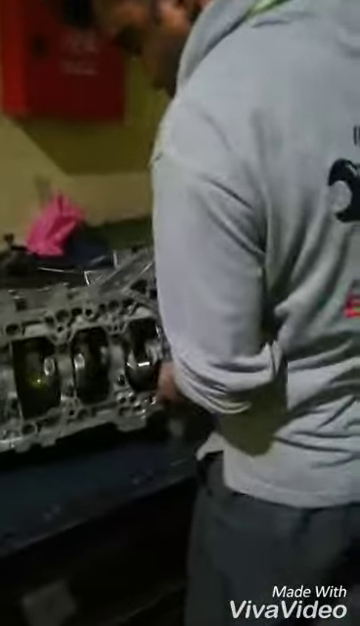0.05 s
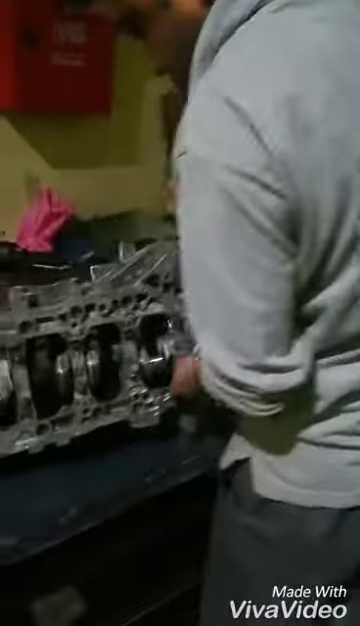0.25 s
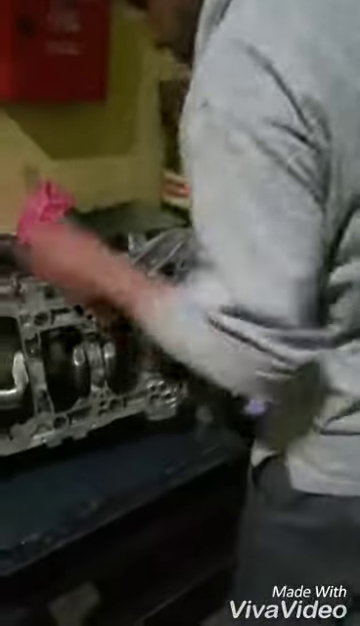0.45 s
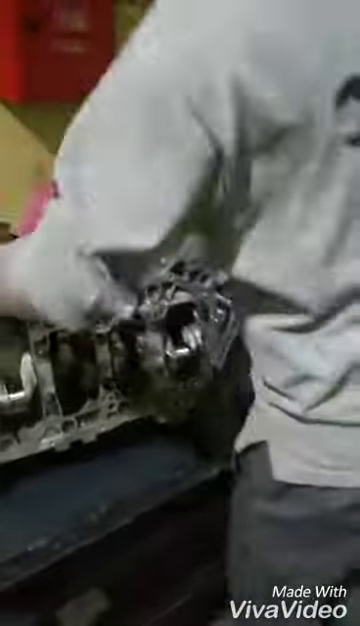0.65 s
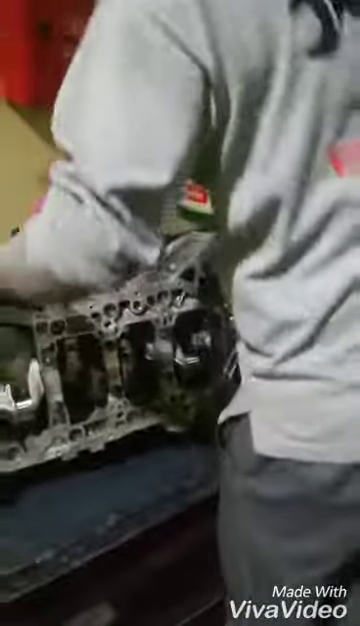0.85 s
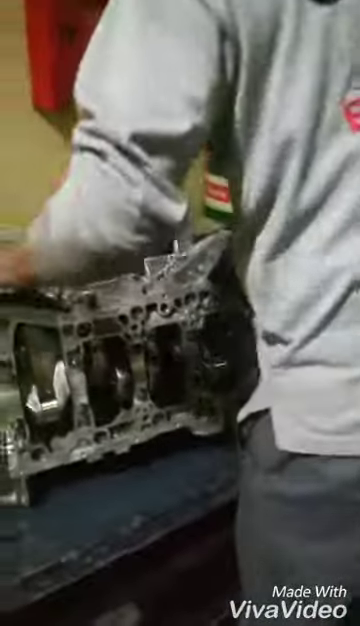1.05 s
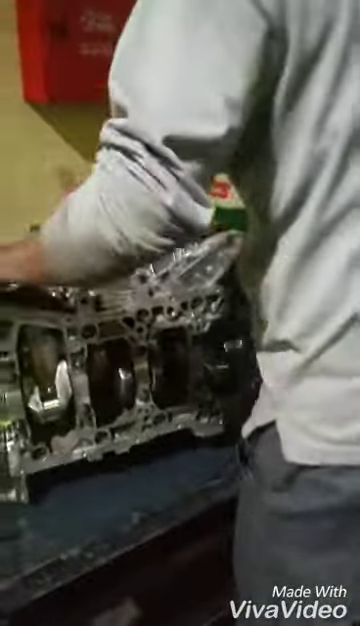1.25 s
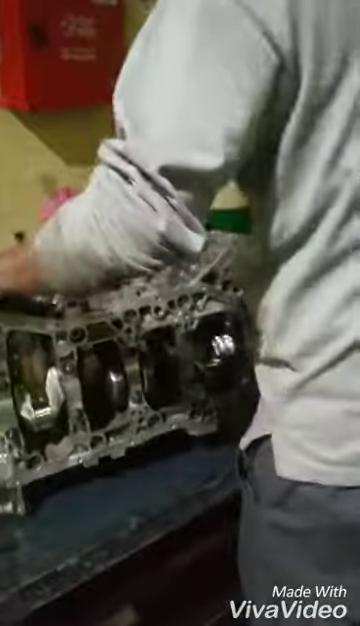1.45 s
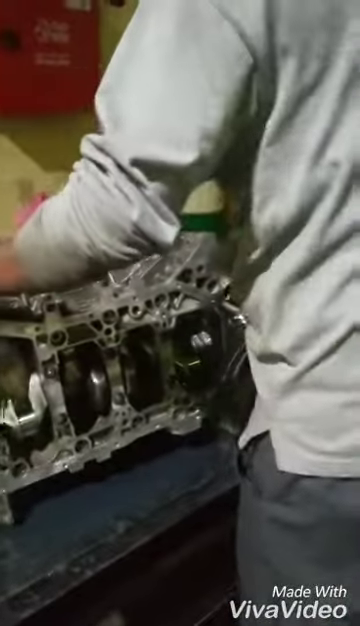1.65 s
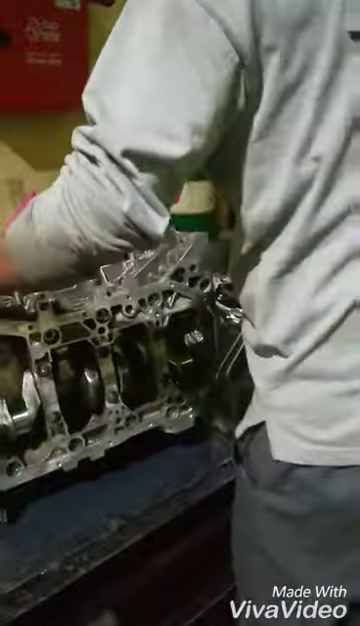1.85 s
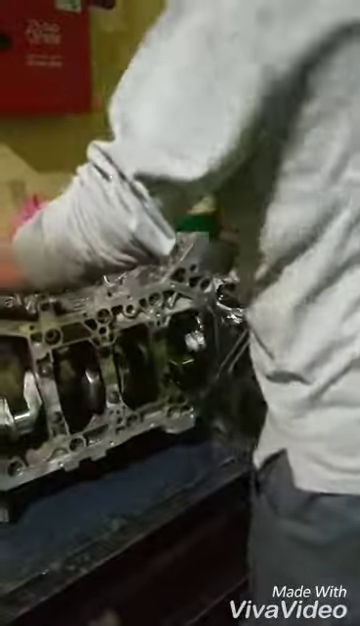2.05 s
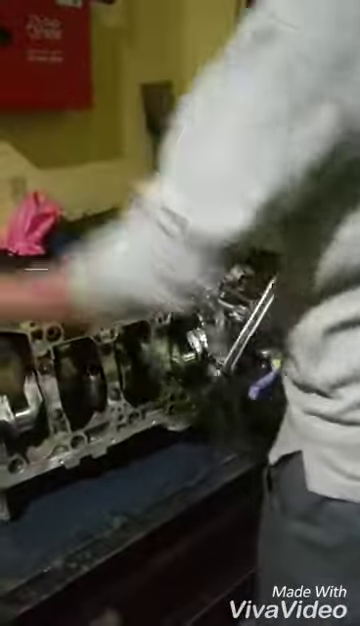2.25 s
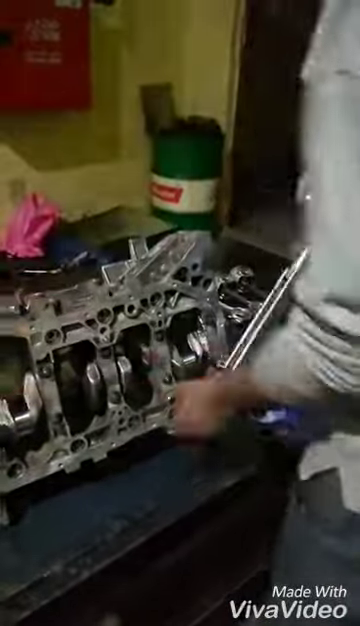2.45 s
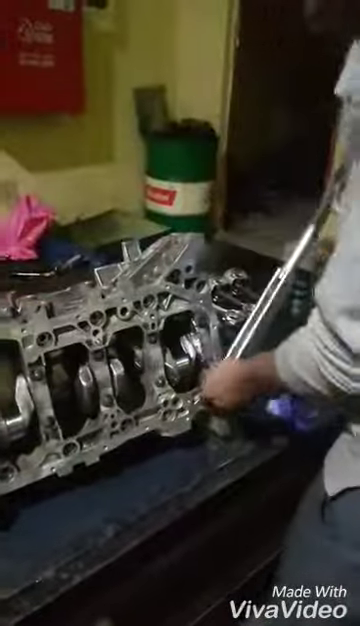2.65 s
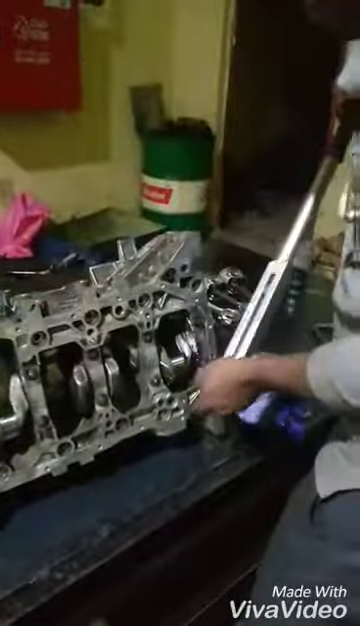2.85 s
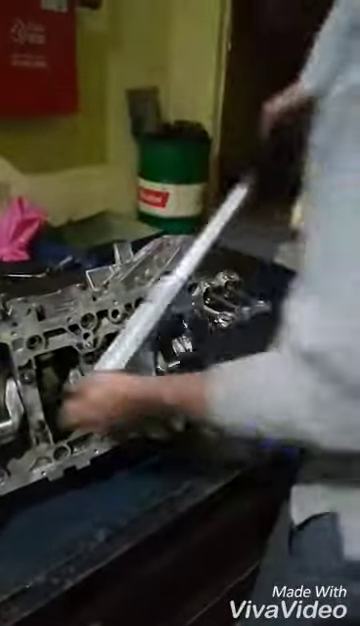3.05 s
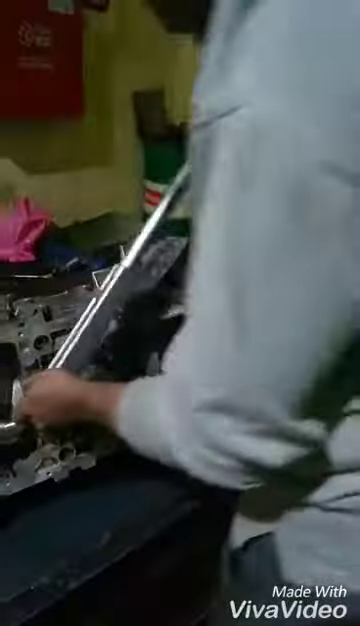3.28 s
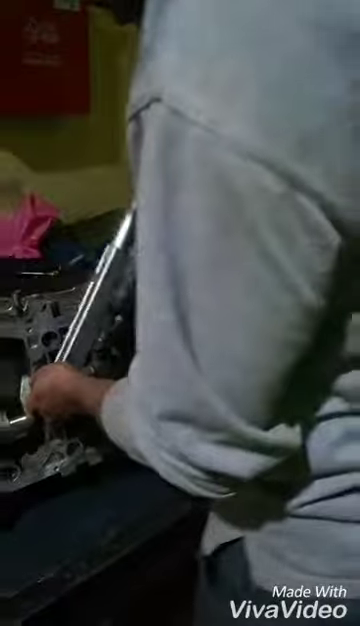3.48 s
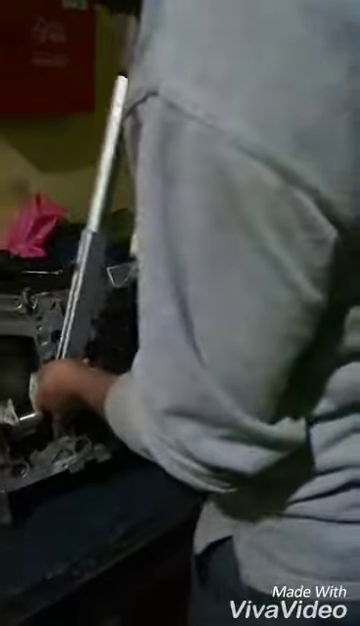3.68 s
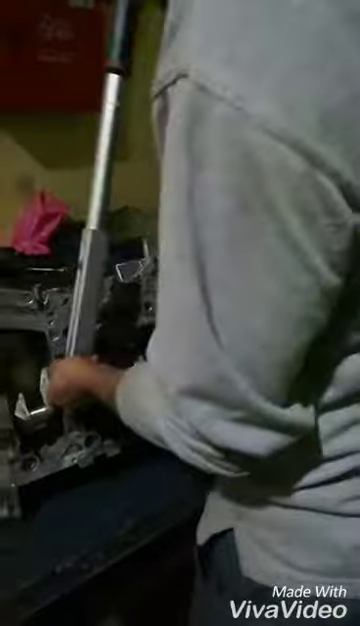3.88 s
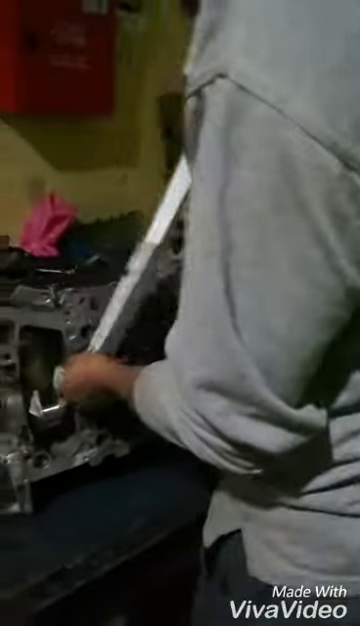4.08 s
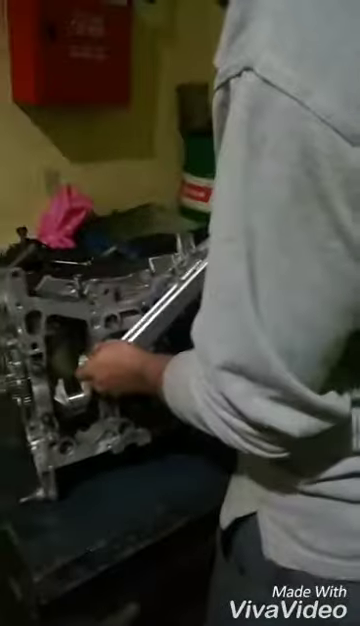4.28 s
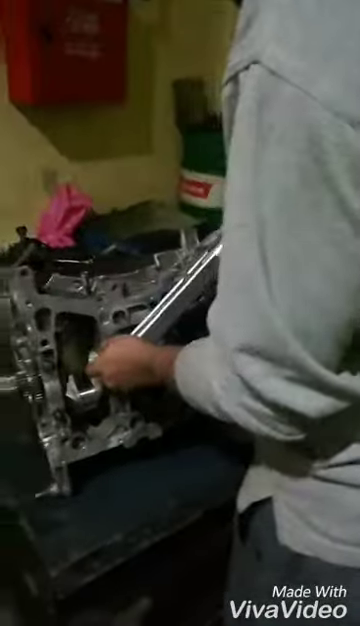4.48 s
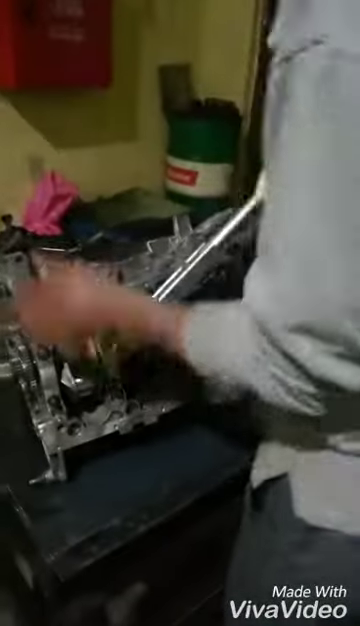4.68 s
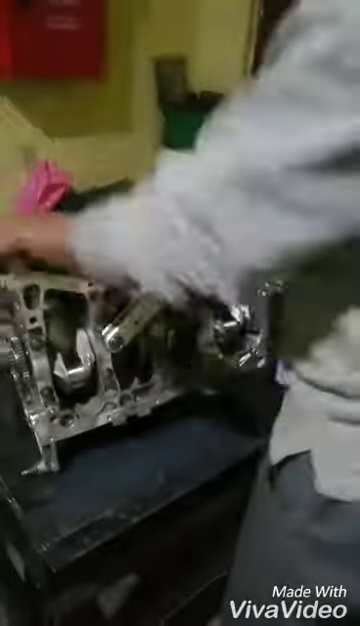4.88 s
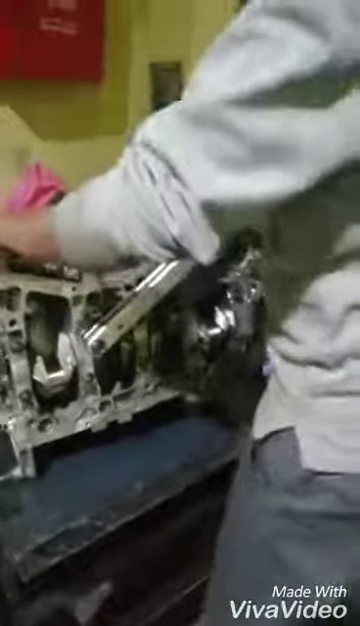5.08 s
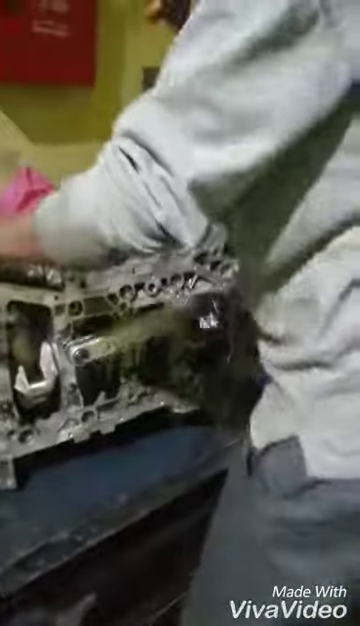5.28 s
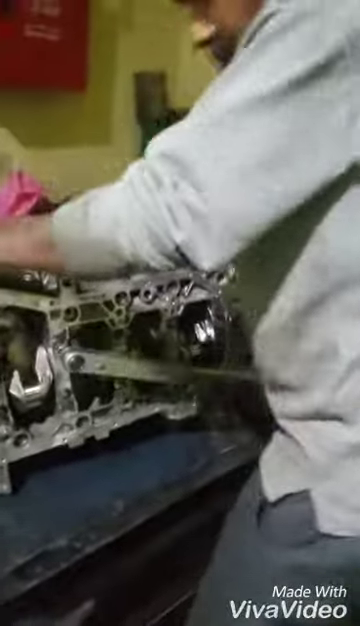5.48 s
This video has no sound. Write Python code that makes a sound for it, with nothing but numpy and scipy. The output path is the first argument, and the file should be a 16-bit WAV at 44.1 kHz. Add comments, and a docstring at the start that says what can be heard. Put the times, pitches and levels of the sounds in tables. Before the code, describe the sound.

Sharp, ringing metal snaps from a wrench over a low hum that sinks away, followed by quieter clicks, cloth rustle and soft bench knocks.

```python
"""A bare workshop, where a ratchet wrench is worked on the bolts of an engine block.
Snaps and clinks are metal modes struck by uneven contacts, with a broad crack and a diffuse hall tail.
Treble ticks lie on the right; sleeves rub in grainy noise, the bench thuds in short sines, a squeak ends it.
Shaped noise makes hall and rumble, wavering sines the machine hum; after the first snaps the hall noise
sinks by about 25 dB, with hum and most of the rumble following. A faint hiss and whine stay steady."""
import sys
import numpy as np
from scipy import signal
from scipy.io import wavfile

SR = 44100
rng = np.random.default_rng(int(sys.argv[2]) if len(sys.argv) > 2 else 0)


def output_pcm(signal):
    """Save a mono or channel-first signal as 16-bit PCM at the path in sys.argv[1].

    Samples are clipped to [-1, 1] before scaling.
    """
    pcm = np.clip(np.atleast_2d(signal).T, -1, 1) * 32767
    wavfile.write(sys.argv[1], SR, np.round(pcm).astype(np.int16))


N = 243431


def amp(db):
    """Turn dB into a linear gain."""
    return 10 ** (np.asarray(db) / 20)


def rms_one(x):
    """Scale a signal to an rms of 1."""
    return x / np.sqrt(np.mean(x ** 2) + 1e-20)


def low_pass(x, hz, order):
    """Dull a signal above this pitch."""
    return signal.lfilter(*signal.butter(order, hz, fs=SR), x)


def in_time(rows):
    """Draw each column as a line through its points in time."""
    s, *columns = np.transpose(rows)
    return [np.interp(np.arange(N) / SR, s, c) for c in columns]


def at_hz(points, hz):
    """Read a curve at a pitch, straight over log frequency."""
    return np.interp(np.log(hz), np.log(np.array(points)[:, 0]), np.array(points)[:, 1])


def panned(pan_db):
    """Left and right gains that differ by pan_db; positive leans left."""
    return amp(np.array([[.5], [-.5]]) * pan_db)


def drift(rate, depth=1, shape=np.asarray):
    """Slow chance of spread depth, drawn at every 40th sample and passed through shape."""
    r = np.exp(-80 * np.pi * rate / SR)
    draws = rng.standard_normal(N // 40 + 2002)
    slow = signal.lfilter([1], [1, -2 * r, r * r], draws)[2000:]
    return np.interp(np.arange(N) / 40, np.arange(len(slow)), shape(depth * rms_one(slow)))


def stroke_db(s, hold_s, rise_db_s, fall_db_s):
    """Level of one gesture: rises to 0 dB at s, holds, falls away."""
    t = np.arange(N) / SR
    rise = abs(rise_db_s) * (t - s)
    fall = abs(fall_db_s) * (s + hold_s - t)
    return np.minimum(0, np.minimum(rise, fall))


def resonance(x, hz, width):
    """Two-pole peak of gain 1."""
    r = np.exp(-np.pi * width / SR)
    poles = [1, -2 * r * np.cos(2 * np.pi * hz / SR), r * r]
    return signal.lfilter([(1 - r * r) / 2, 0, (r * r - 1) / 2], poles, x)


def bands(lo_hz, hi_hz):
    """Band-passes of about half an octave, with their centres."""
    edges = np.geomspace(lo_hz, hi_hz, int(2 * np.log2(hi_hz / lo_hz)) + 2)
    return [(np.sqrt(a * b), signal.butter(2, [a, b], "band", fs=SR, output="sos"))
            for a, b in zip(edges, edges[1:])]


# How alike the two channels are. Each row: pitch in Hz, likeness (held within -1 to 1).
STEREO_LIKENESS = [(60, 0.98), (130, 0.98), (290, 0.86), (640, -0.47), (1410, 0.4), (3100, -0.55),
                   (6820, 0.23), (15000, -1.8)]
# Which way the noise leans. Each row: pitch in Hz, left minus right in dB.
STEREO_BALANCE = [(60, -1), (110, -0.5), (200, 0.5), (380, -3.5), (700, -0.5), (1290, 1.5), (2380, 7.5),
                  (4400, 5), (8120, -3.5), (15000, -7.5)]


def stereo(pair, hz):
    """Two unrelated signals mixed to about the likeness and balance of the hall at this pitch."""
    alike = np.clip(at_hz(STEREO_LIKENESS, hz), -1, 1)
    mix = np.sqrt([1 + alike, 1 - alike]) * [[1, 0.8], [1, -0.97]]
    return panned(at_hz(STEREO_BALANCE, hz)) * mix @ pair


def noise(spectrum, patchy_db, modes=()):
    """Stereo noise of a spectrum with flickering bands, plus narrow resonances; rms about 1."""
    white = rng.standard_normal((2, 2, N))
    out = 0
    for k, (hz, sos) in enumerate(bands(spectrum[0][0], min(spectrum[-1][0], 18000))):
        band = amp(at_hz(spectrum, hz)) * signal.sosfilt(sos, white[k % 2])
        out = out + drift(3.6, patchy_db, amp) * stereo(band, hz)
    out = rms_one(out)
    for hz, width, db in modes:
        out = out + stereo(amp(db) * rms_one(resonance(white[0], hz, width)), hz)
    return out


# Ringing modes of the wrench. Each row: pitch in Hz, width in Hz, strength in dB before dividing by width.
WRENCH_MODES = [(1250, 70, -12), (1620, 22, -13), (2100, 120, -4), (2410, 18, -10), (2650, 60, 0),
                (2830, 42, -4), (2960, 45, -2), (3070, 80, -1), (3225, 8, -14), (3340, 80, 2),
                (3460, 80, -3), (3870, 45, -6), (4240, 100, -1), (4600, 150, 2), (4850, 10, -14),
                (5260, 110, 1), (5800, 160, 0), (6150, 160, 0), (6600, 140, 0), (7400, 240, 1),
                (9450, 160, -1), (10400, 200, 1), (11400, 200, -1), (13400, 300, 0)]
# Colour of the broad crack before each blow's tilt. Each row: pitch in Hz, relative density in dB per Hz.
CRACK_COLOUR = [(410, -51.5), (700, -35), (1100, -21.5), (1640, -13.5), (2350, -3), (2950, 4.5), (3550, 0),
                (4610, 1.5), (7790, -9.5), (13000, -18.5), (15000, -19), (16000, -24)]
MODE_CHANCE_DB = 1.2  # spread per mode and blow
# The sharpest modes come in pairs that beat: width limit, split as a share of pitch, twin's level.
TWIN_UNDER_HZ, TWIN_SPLIT, TWIN_DB = 15, .022, -4
# The ring flutters unevenly once the contacts die away: upper rate, depth.
RING_FLUTTER_HZ, RING_FLUTTER = 40, .4


def blow(lifts, tilt, chatter_s, crack_db, bank, size=8192):
    """Uneven, dying contacts strike modes, the favoured shifted a little by the grip; a crack rides on top.

    Returns the sound, peak 1, and its broad colour alone as one click of unit energy."""
    fade = np.exp(-np.arange(size) / SR / max(chatter_s, 1e-4))
    contacts = rng.standard_normal(size) * (rng.random(size) < .3) * fade
    contacts[0] = 1.7
    impulse = signal.unit_impulse(size)
    strike = impulse + .07 * contacts + 1e-18  # the first contact sets most of the ring
    favoured = {}
    for hz, lift_db in lifts:
        nearest = min(WRENCH_MODES, key=lambda mode: abs(mode[0] - hz))
        favoured[nearest[0]] = (hz, lift_db)

    rings = 0
    for k, (hz, width, db) in enumerate(WRENCH_MODES):
        hz, lift_db = favoured.get(hz, (hz, 0))
        gain = amp(db + at_hz(tilt, hz) + lift_db + rng.normal(0, MODE_CHANCE_DB))
        ring = resonance(strike, hz, width)
        if width < TWIN_UNDER_HZ:
            ring = ring + amp(TWIN_DB) * resonance(strike, hz * (1 - TWIN_SPLIT), width)
        rings = rings + (-1) ** k * gain / width * ring
    flutter = low_pass(rng.standard_normal(size), RING_FLUTTER_HZ, 1)
    rings = rings * (1 + RING_FLUTTER * rms_one(flutter) * (1 - fade))

    both = np.array([contacts, impulse]) + 1e-18
    crack, click = sum(amp(at_hz(CRACK_COLOUR, hz) + at_hz(tilt, hz)) * signal.sosfilt(sos, both) * (-1) ** k
                       for k, (hz, sos) in enumerate(bank))
    out = rms_one(rings) + amp(crack_db) * rms_one(crack)
    return out / np.abs(out).max(), click / np.linalg.norm(click)


# Reflections off walls and bench. Each row: delay in seconds, left in dB, right in dB.
EARLY_ECHOES = [(0.0123, -18, -19), (0.018, -15, -24), (.0361, -21, -25.5)]


def echoes(x):
    """A few early reflections, duller than the direct sound."""
    dull = low_pass(x, 7000, 1)
    return sum(amp([[left_db], [right_db]]) * np.roll(dull, round(s * SR))
               for s, left_db, right_db in EARLY_ECHOES)


# Decay of the hall before the late cut. Each row: pitch in Hz, time to fall 60 dB in seconds.
HALL_DECAY = [(1000, 0.45), (3000, 0.79), (7000, 0.9), (12000, 0.6), (16000, 0.069)]
# Which way the tail leans. Each row: pitch in Hz, left minus right in dB.
TAIL_BALANCE = [(600, -6), (1500, 1), (3000, 2), (5000, 4), (8000, 0.5), (13000, -7)]
TAIL_KNEE_S, TAIL_CUT_DB_S = 0.73, 37.5  # after this long the tail sinks faster


def room(x):
    """A diffuse tail of its own in each channel, dying band by band, fast at first."""
    t = np.arange(SR) / SR
    white = rng.standard_normal((2, 2, SR))
    tail = 0
    for k, (hz, sos) in enumerate(bands(440, 21000)):
        decay = amp(-60 * t / at_hz(HALL_DECAY, hz))
        tail = tail + signal.sosfilt(sos, white[k % 2]) * decay * panned(at_hz(TAIL_BALANCE, hz))
    tail = tail * (1 - np.exp(-t / 0.0015)) * (1 + 4.5 * np.exp(-t / 0.007))
    tail = tail * amp(-TAIL_CUT_DB_S * np.maximum(t - TAIL_KNEE_S, 0))
    return signal.fftconvolve(x[None], tail, axes=1)[:, :N]


# Metal blows. Each row: start in seconds, peak in dB before panning and room, favoured modes as pairs of
# pitch in Hz and lift in dB, then tilt in dB of the body (1300 Hz), low modes (2800 Hz) and high modes
# (11000 Hz), pan in dB (left minus right), left delay in ms, chatter decay in seconds,
# crack over ring in dB, send to the hall in dB.
WRENCH_BLOWS = [(0.458, -31, [(2950, 13), (3330, 12), (4240, 4)], -9, -5, -8, -6, .05, .012, -12, -34),
                (1.1006, 6.5, [(2627, 19), (2815, 18), (4608, 17), (11412, 18)],
                -5, -3.5, 9, -6.5, 0.13, 0.0045, -1.5, -33), (1.657, -25, [(1625, 21), (2734, 17),
                (5000, 12), (5770, 19)], -5.5, -10, -20, 2, .05, 0.074, -21, -31), (1.7, 4, [(2104, 17.5),
                (3316, 15), (3852, 16.5), (5216, 6.5)], 0, -3.5, 9.5, -6, 0.14, 0.0028, 0, -35.5),
                (1.986, 3, [(1250, 7.5), (3068, -2), (4602, 19.5), (5297, 17)],
                -3, -3, 7, -6.5, 0.095, 0.0042, -3.5, -34), (2.1462, -2, [(2099, 16.5), (3073, 10.5),
                (3348, 14.5), (5302, 13)], -4.5, -1.5, 10, -5.5, 0.043, 0.0021, -2.5, -29),
                (3.166, -52.5, [(3330, 9.5)], -9, -2, 0.5, -0.5, 0.093, .0015, 3, -27.5),
                (3.3008, -19, [(2406, 15), (2960, 16), (3900, 18), (6454, 9.5)],
                -10.5, -3.5, -5, -3, 0.65, 0.0048, -1, -37), (3.451, -47, [(3070, 13), (5260, 11)],
                -9, 0, 3, -0.5, .05, .003, 0, -36), (3.4932, -38.5, [(2960, 15.5), (5260, 12.5)],
                -6.5, 5.5, -14.5, -5, 0.058, 0.003, 1.5, -34), (3.8217, -36.5, [(2228, 13.5), (3046, 12),
                (3289, 9)], -5, 3.5, -4, 2.5, 0.054, 0.0024, -5, -35.5), (3.8345, -23.5, [(3282, 22),
                (4170, 9.5), (4720, 16.5), (3253, 14)], -8, 0.5, -30, -1.5, 0.21, 0.0042, 0, -38),
                (3.842, -30.5, [(4200, 10), (2844, 14)], 2, 3, -22, 6, 0.12, 0.0049, 6, -40),
                (3.89, -47.5, [(3461, 20)], -11, 6, -15, 8, 0.19, .001, -8, -35.5),
                (4.2074, -14.5, [(1260, 13.5), (2100, 14.5), (2847, 8), (2976, 10), (3235, 11.5),
                (3330, 16.5), (5260, 13)], -1.4, 3.5, 8.5, -1.5, 0.018, 0.0033, 0.5, -38),
                (4.512, -42.5, [(1280, 22.5), (4300, 10.5)], -3.5, -3, -10.5, -1, 0.072, .0026, -4, -34),
                (4.8, -56, [(1250, 18), (3070, 8)], -3.5, -3.5, -8.5, -0.5, 0.07, .004, 1, -34),
                (5.167, -10.5, [(1330, 5.5), (2928, 17), (3865, 19), (5194, 16), (10389, 10.5)],
                -7, 0, 16, -9, 0.13, 0.0081, 0, -34.5)]
# A notch for the left channel, then the right. Each row: pitch in Hz, width in Hz, gain in dB.
CHANNEL_DIPS = [(3200, 1400, -7), (4930, 400, -2.5)]
SHADOW_HZ, SHADOW_DB = 8000, -11  # the left side is shaded from the wrench above this pitch
RING_TO_ROOM, RING_TO_ROOM_HZ = .13, 4500  # share of the ring that the hall carries, below this pitch


def wrench(level_db):
    """Metal blows, direct and through the hall; each offsets the level at its start, then rides it."""
    direct, sent = np.zeros((2, N + 8192)), np.zeros(N + 8192)
    bank = bands(580, 17070)
    for (s, db, lifts, body_db, low_db, high_db, pan_db,
         late_ms, chatter_s, crack_db, hall_db) in WRENCH_BLOWS:
        i = round(s * SR)
        gain = amp(db - level_db[i])
        tilt = [(1300, body_db), (2800, low_db), (5000, 0.0084), (11000, high_db)]
        hit, click = blow(lifts, tilt, chatter_s, crack_db, bank)
        starts = i + round(late_ms * SR / 1000), i
        for channel, start, side in zip(direct, starts, panned(pan_db)):
            channel[start:start + len(hit)] += gain * side * hit
        # all directions mix in the hall, so mostly the broad colour reaches the tail
        carried = RING_TO_ROOM * low_pass(hit, RING_TO_ROOM_HZ, 2)
        sent[i:i + len(hit)] += gain * amp(hall_db) * (click + carried)

    direct += 1e-18
    early = echoes(direct.mean(axis=0))
    dull = low_pass(direct[0], SHADOW_HZ, 2)
    direct[0] = dull + amp(SHADOW_DB) * (direct[0] - dull)
    direct = np.array([channel + (amp(db) - 1) * resonance(channel, hz, width)
                       for channel, (hz, width, db) in zip(direct, CHANNEL_DIPS)])
    return ((direct + early)[:, :N] + room(sent)) * amp(level_db)


# Thin bright ticks. Each row: start in seconds, peak in dB before panning, pan in dB (left minus right).
BRIGHT_TICKS = [(0.0418, -42, -15), (0.567, -40, -13), (3.01, -56, -14.5), (3.023, -52.5, -15.5),
                (4.0324, -65.5, -6.5), (4.045, -48.5, -18.5), (4.0554, -55, -11), (4.0695, -44, -21),
                (4.462, -53, -18.5), (4.491, -49.5, -32), (4.89, -56.5, -9), (4.975, -50.5, -10)]
TICK_LOW_HZ, TICK_HIGH_HZ = 6000, 14200


def ticks():
    """Tiny snaps: treble-filtered noise that dies within milliseconds."""
    out, fade = np.zeros((2, N)), np.exp(-np.arange(300) / SR / 0.00069)
    treble = signal.butter(1, (TICK_LOW_HZ, TICK_HIGH_HZ), "band", fs=SR)
    for s, db, pan_db in BRIGHT_TICKS:
        snap = signal.lfilter(*treble, rng.standard_normal(300) * fade)
        out[:, round(s * SR):][:, :300] += panned(pan_db) * amp(db) * snap / np.abs(snap).max()
    return out


# Colours of the cloth. Each row: pitch in Hz, relative density in dB per Hz.
RUB_BRIGHT_COLOUR = [(6000, -17.5), (8000, 3), (11000, -3.5), (14000, 5), (16000, 0)]
RUB_DULL_COLOUR = [(1800, -16), (2800, -2.5), (4500, -2.5), (6500, -8.5), (8000, -38.5)]
# Resonances in the dull rub. Each row: pitch in Hz, width in Hz, level in dB.
RUB_RESONANCES = [(3770, 270, -16), (4400, 500, -12)]
# Sleeve strokes. Each row: start of the full level in seconds, rise before it in dB per second,
# hold in seconds, bright level in dB, dull level in dB.
SLEEVE_RUBS = [(0.457, 305, 0.052, -44.5, -45), (0.58, 300, 0.063, -73, -59.5),
               (0.654, 2000, 0.007, -53, -56), (0.906, 618, 0.055, -100, -56),
               (1.008, 604, 0.031, -64, -54), (3.016, 2001, 0.039, -66, -72),
               (4.519, 1001, 0.096, -69.5, -65.5), (4.715, 1000, 0.022, -70, -75.5),
               (4.819, 600.5, 0.08, -84.5, -75.5), (4.984, 599.5, 0.11, -77, -75)]
RUB_FALL_DB_S = 352


def sleeves():
    """Rubbing cloth: grainy noise in a bright and a dull band, swelling with each stroke."""
    bright = noise(RUB_BRIGHT_COLOUR, patchy_db=.7)
    dull = noise(RUB_DULL_COLOUR, patchy_db=.7, modes=RUB_RESONANCES)
    bright_gain, dull_gain = sum(
        amp(stroke_db(s, hold_s, rise_db_s, RUB_FALL_DB_S) + [[bright_db], [dull_db]])
        for s, rise_db_s, hold_s, bright_db, dull_db in SLEEVE_RUBS)
    grain = drift(150, 2.5, amp)
    return grain * (bright_gain * bright + dull_gain * dull)


SQUEAK_S, SQUEAK_DB, SQUEAK_RISE_DB_S = 5.52, -52, 420  # top of the swell, gain there, rise up to it
SQUEAK_PER_S, SQUEAK_GLIDE_PER_S2 = 385, 2500  # slips per second at the top, and how fast they quicken


def squeak():
    """Stick-slip pulses of a bolt under load, uneven and rounded, quicken as they swell into a resonance."""
    before = np.maximum(SQUEAK_S - np.arange(N) / SR, 0)
    per_s = np.maximum(SQUEAK_PER_S - SQUEAK_GLIDE_PER_S2 * before, SQUEAK_PER_S / 2)
    turns = np.cumsum(per_s * (1 + drift(60, .05))) / SR
    slips = np.diff(np.floor(turns), prepend=0) * (1 + 0.3 * rng.standard_normal(N))
    soft = low_pass(slips, 900, 2)
    return amp(SQUEAK_DB - SQUEAK_RISE_DB_S * before) * rms_one(resonance(soft, 260, 155))


# Thuds and small knocks through the bench. Each row: start in seconds, envelope peak in dB, pitch in Hz.
BENCH_THUDS = [(1.121, -27, 94), (1.657, -28, 95.7), (1.721, -29, 109), (2.009, -35, 104),
               (2.199, -35.5, 103), (2.306, -53.5, 1150), (2.356, -51, 1143), (2.536, -62.5, 1157),
               (2.645, -67, 1260), (4.499, -46.5, 96.7), (4.635, -65.5, 1170), (4.631, -48.5, 171),
               (4.698, -48, 182), (4.75, -66.5, 1167), (4.768, -47.5, 184), (4.83, -64.5, 1212),
               (5.185, -55, 736), (5.196, -50, 288), (5.201, -47, 110), (5.217, -49, 190),
               (5.248, -48.5, 98), (5.311, -47.5, 217), (5.362, -44, 191.4), (5.439, -50, 223.6)]
THUD_T60_S, THUD_SHORTENS = 0.14, .3  # at 100 Hz; power by which higher thuds die sooner


def thuds():
    """Soft pushes: a sine that swells for a moment and dies."""
    out, t = np.zeros(N + SR), np.arange(SR // 2) / SR
    for s, db, hz in BENCH_THUDS:
        decay = amp(-60 * t / THUD_T60_S * (hz / 100) ** THUD_SHORTENS)
        swell = (1 - np.exp(-t / 0.0016)) * decay
        out[round(s * SR):][:len(t)] += amp(db) * swell / swell.max() * np.sin(2 * np.pi * hz * t)
    return out[:N]


# Fainter multiples that come and go. Each row: multiple of the hum pitch, mid level in dB.
HUM_MULTIPLES = [(2.5, -13), (3.0, -14), (4.0, -16), (5.0, -17)]
# Two more multiples that swell for a while. Each row: multiple of the hum pitch, mid level in dB.
HUM_SWELL_MULTIPLES = [(3.5, -8), (4.47, -9)]
HUM_SWELL_S, HUM_SWELL_HOLD_S = .9, 0.95  # full from this time, for this long
# The hum fades for a while. Each row: full depth from in seconds, length in seconds, depth in dB.
HUM_FADES = [(2.252, 0.38, 12.5), (4.822, 0.3, 8)]
HUM_HZ, HUM_WAVER_HZ, HUM_WAVER_DB = 78.4, 1.3, 2.0  # pitch, spread of pitch, spread of strength
REFERENCE_DB = -45  # hall level at which hum and rumble have their stated levels
HUM_DB, HUM_FOLLOWS = -38.5, .85  # level; share of the hall level's swing


def hum(level_db):
    """A machine tone that wavers in pitch and strength, with steady-pitched multiples of wavering strength."""
    turns = 2 * np.pi * np.cumsum(HUM_HZ + drift(12, HUM_WAVER_HZ)) / SR
    even = 2 * np.pi * HUM_HZ * np.arange(N) / SR
    upper = sum(amp(db) * drift(2.5, 4, amp) * np.sin(k * even) for k, db in HUM_MULTIPLES)
    swelling = sum(amp(db) * drift(4, 2.5, amp) * np.sin(k * even) for k, db in HUM_SWELL_MULTIPLES)
    swell = amp(stroke_db(HUM_SWELL_S, HUM_SWELL_HOLD_S, 40, 40)) * swelling
    tone = np.sqrt(2) * (drift(8, HUM_WAVER_DB, amp) * np.sin(turns) + upper + swell)
    fades_db = sum(db * amp(stroke_db(s, length_s, 120, 57)) for s, length_s, db in HUM_FADES)
    return amp(HUM_DB + HUM_FOLLOWS * (level_db - REFERENCE_DB) - fades_db) * tone


# Colour of the rumble. Each row: pitch in Hz, relative density in dB per Hz.
RUMBLE_COLOUR = [(24, -46.5), (40, -14.5), (62, -4), (80, -1), (108, -2.5), (190, -1), (296, -5),
                 (354, -14), (460, -19.5), (700, -31), (910, -53), (1540, -120)]
# Resonances in the rumble. Each row: pitch in Hz, width in Hz, level in dB.
RUMBLE_RESONANCES = [(141, 7.4, -7), (187, 25, -12.5), (344, 15, -13.5)]
# Colour of the deepest rumble. Each row: pitch in Hz, relative density in dB per Hz.
SUB_COLOUR = [(18, -2), (25, -2), (40, 1.5), (60, 0.5), (75, -23.5)]
RUMBLE_DB, RUMBLE_FOLLOWS = -40, 0.9  # level at REFERENCE_DB; share of the hall level's swing
SUB_DB = -67


def rumble(level_db):
    """Low patchy noise that follows the hall level, over a deepest layer that does not."""
    rumble_db = RUMBLE_DB + RUMBLE_FOLLOWS * (level_db - REFERENCE_DB)
    low = amp(rumble_db) * noise(RUMBLE_COLOUR, patchy_db=3.0, modes=RUMBLE_RESONANCES)
    return low + amp(SUB_DB) * noise(SUB_COLOUR, patchy_db=1.9)


# Colour of the hall's noise. Each row: pitch in Hz, relative density in dB per Hz.
HALL_COLOUR = [(240, -31.5), (400, -1.5), (474, -11), (512, 0.5), (636, 6.5), (1250, 0.5), (2020, -7.5),
               (2630, -16.5), (3020, -3), (6340, -34.5), (7280, -53), (11000, -41), (14800, -38),
               (16000, -34)]
# Resonances of the hall's noise. Each row: pitch in Hz, width in Hz, level in dB.
HALL_RESONANCES = [(608, 25, -13.5), (784, 9.8, -10.5), (1120, 55, -18), (1312, 7.4, -15.5)]


def hall(level_db):
    """Air of the workshop: shaped noise with narrow resonances, 4 dB above the hall level."""
    return amp(level_db + 4.0) * noise(HALL_COLOUR, patchy_db=1.0, modes=HALL_RESONANCES)


# How loud the hall comes through. Each row: time in seconds, level in dB.
HALL_LEVEL = [(0.0, -48.5), (0.47, -44.5), (0.98, -47), (1.25, -51), (1.63, -53), (1.84, -55.5),
              (2.23, -57.5), (2.38, -62), (2.48, -69), (2.61, -69.5), (3.17, -72), (3.5, -71.5),
              (3.63, -73.5), (4.2, -74), (4.45, -74), (4.7, -71.5), (5.0, -73.5), (5.3, -71.5), (5.42, -76),
              (5.52, -74.5)]


def scene():
    """The wrench and the sounds around it, over the sinking bed of the hall."""
    level_db, = in_time(HALL_LEVEL)
    work = wrench(level_db) + ticks() + sleeves() + squeak() + thuds()
    return work + hum(level_db) + rumble(level_db) + hall(level_db)


# Colour of the microphone hiss. Each row: pitch in Hz, relative density in dB per Hz.
HISS_COLOUR = [(5000, -10.5), (8000, -5.5), (12000, -5), (14500, -4), (16500, -3)]
HISS_DB = -78.5
WHINE_HZ, WHINE_DB = 14406, -94.5  # a thin steady tone
CUTOFF_HZ = 16200


def record(dry):
    """The microphone adds a faint hiss and whine; the hardest peaks clip and the top is cut."""
    hiss = amp(HISS_DB) * noise(HISS_COLOUR, patchy_db=2.5)
    whine = amp(WHINE_DB) * np.sin(2 * np.pi * WHINE_HZ * np.arange(N) / SR)
    clipped = np.clip(dry + (hiss + whine), -1, 1)
    top_cut = signal.cheby2(12, 60, CUTOFF_HZ, fs=SR, output="sos")
    return np.clip(signal.sosfilt(top_cut, clipped), -1, 1)


dry = scene()
out = record(dry)
output_pcm(out)
```